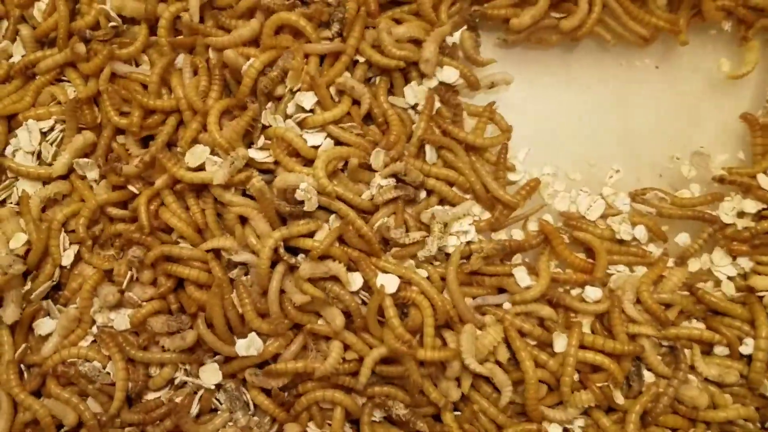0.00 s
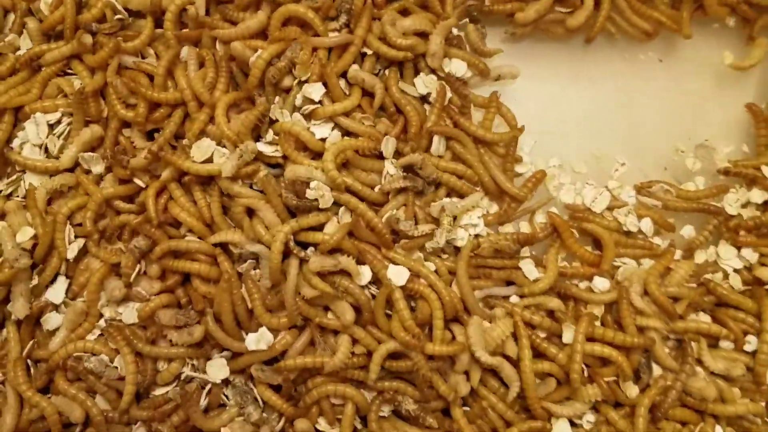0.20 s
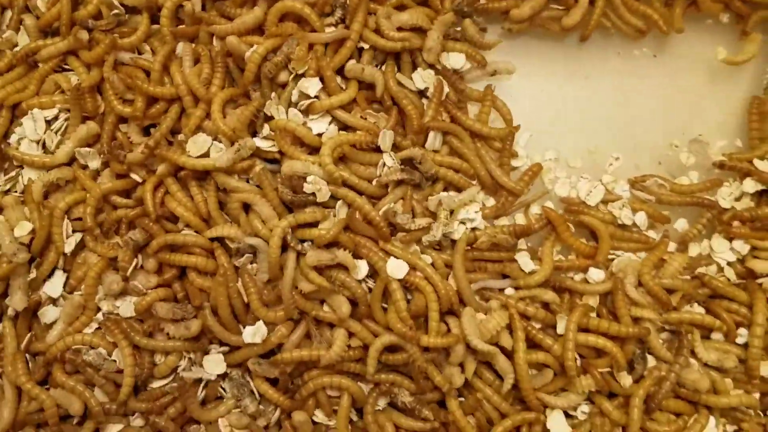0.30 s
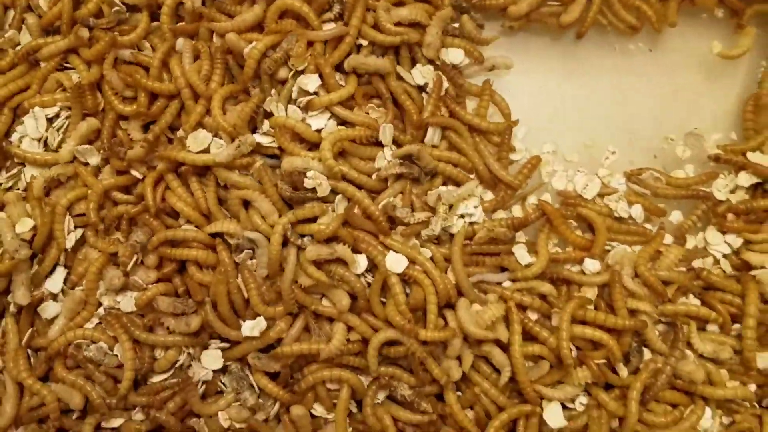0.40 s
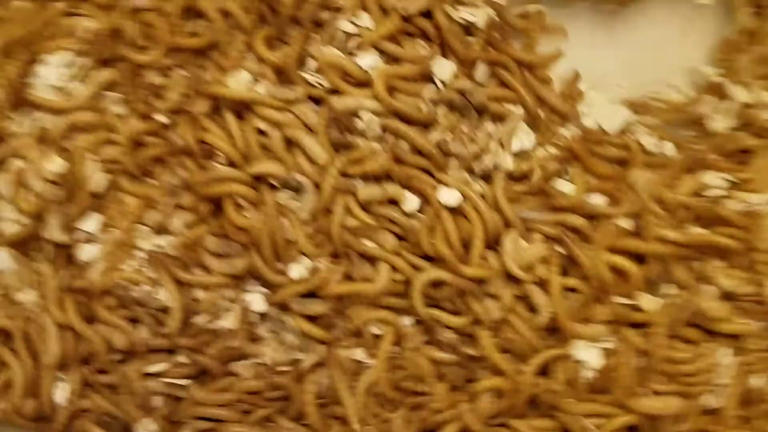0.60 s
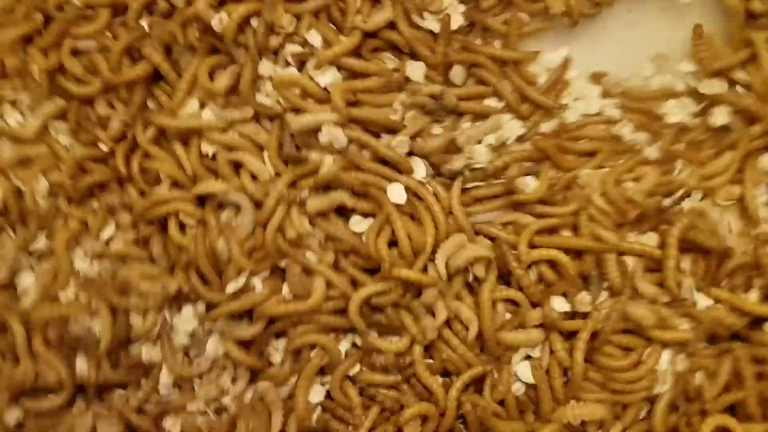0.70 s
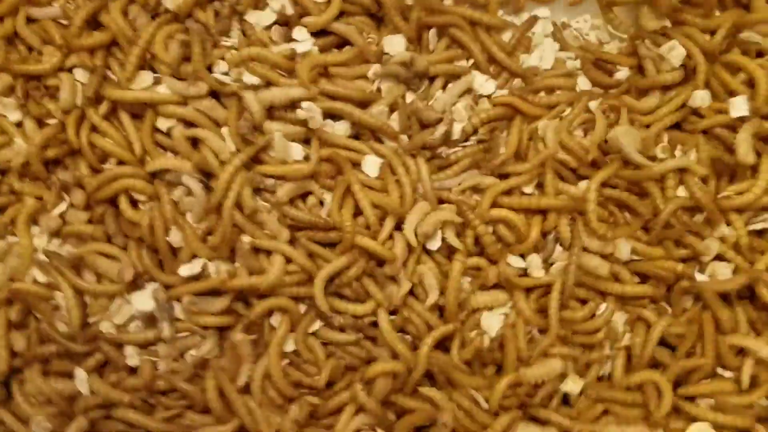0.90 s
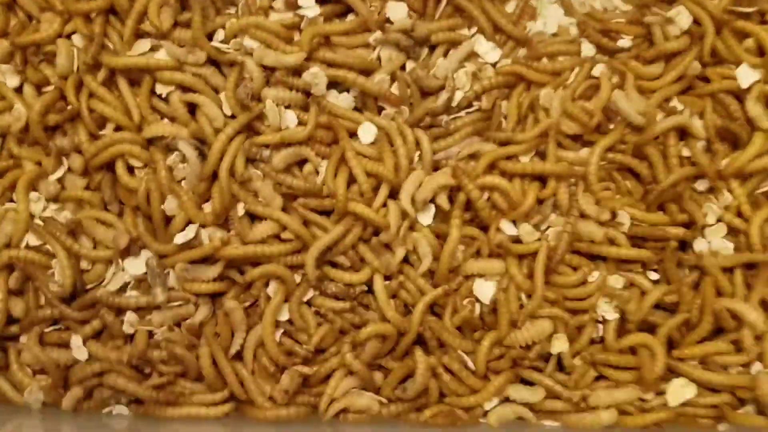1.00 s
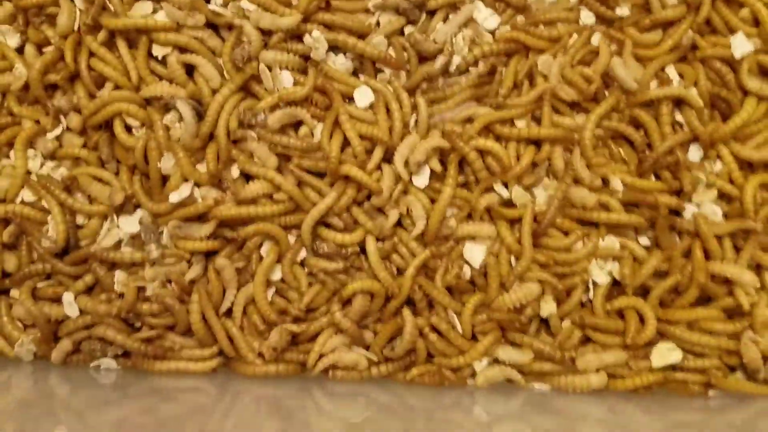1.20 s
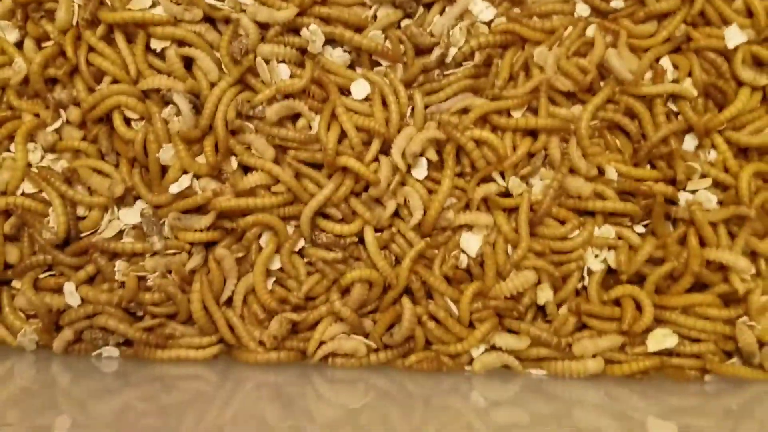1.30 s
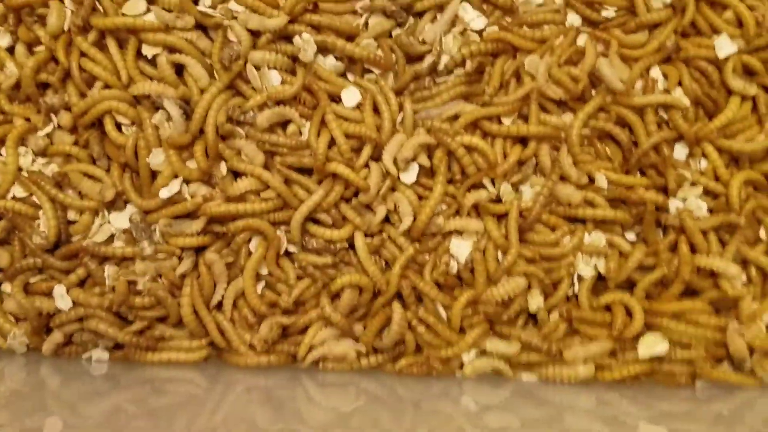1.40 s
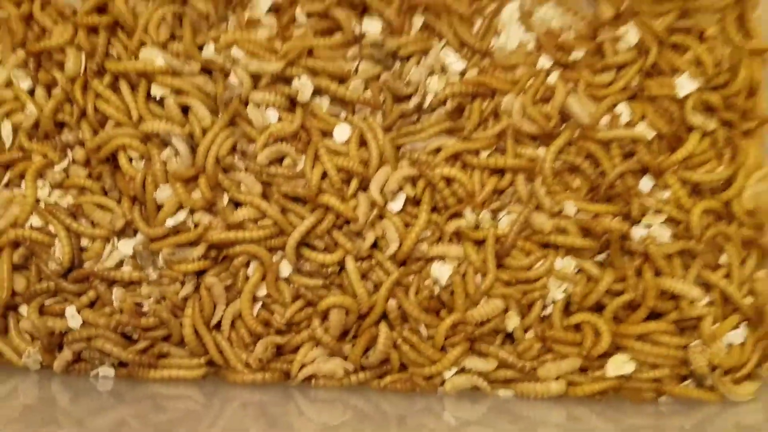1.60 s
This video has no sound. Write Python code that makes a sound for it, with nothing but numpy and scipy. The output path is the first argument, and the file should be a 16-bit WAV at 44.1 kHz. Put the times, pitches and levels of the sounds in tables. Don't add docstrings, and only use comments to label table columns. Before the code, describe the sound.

A heap of mealworms and dry oat flakes slides in a plastic tub: a few faint taps, then one crackling sweep with sharp snaps and soft thumps, fading to low room hum; close stereo microphone, small quiet room.

```python
import sys
import numpy as np
from scipy import signal
from scipy.fft import rfft, irfft, next_fast_len
from scipy.io import wavfile

SR = 44100
rng = np.random.default_rng(int(sys.argv[2]) if len(sys.argv) > 2 else 0)


def magnitude_from_level(level_db):
    exponent = np.asarray(level_db, float) / 20
    return 10 ** exponent


def persist_wave(psi):
    counts = np.round(np.clip(psi, -1, 1) * 32767).astype(np.int16)
    wavfile.write(sys.argv[1], SR, np.atleast_2d(counts).T)


N = 74970

# start_s, peak_db, length_s, dull_part_db, left_right_db
CLUMP_CRUSHES = [(0.131, -45, .008, 15, 3), (0.173, -36, 0.0078, 3.5, 3), (0.2204, -31.5, .005, 0.5, 2),
                 (0.263, -46, 0.0045, 12.5, -3), (0.435, -25, 0.0054, -18, -2),
                 (0.531, -16.5, 0.013, -1.5, 4), (0.597, -22, 0.011, -1, 10), (0.62, -15.5, 0.011, -6, 8),
                 (.637, -23, .014, -6, -3), (0.68, -28, 0.0056, -7, 4), (.695, -6.5, 0.0076, -8, 12),
                 (0.706, -16, 0.023, -8, 7.5), (0.721, -17, 0.015, 7, 6), (0.773, -19, 0.016, -21, 13),
                 (.788, -30, 0.009, -12, 12), (0.834, -23, .014, 7, 11), (0.871, -20, 0.019, 1.5, 8),
                 (0.919, -22, 0.013, 3.5, 14), (1.128, -33, 0.023, -10, 3), (1.24, -35.5, .004, 6.5, 10),
                 (1.2552, -31.5, 0.0067, 0, -6)]
# start_s, peak_db, pitch_hz, left_right_db
FLAKE_SNAPS = [(0.1313, -30.5, 2490, 4), (.1745, -31, 3900, 0), (0.176, -43, 3900, 3),
               (.2215, -32, 1940, 4), (.269, -45, 1200, 3), (0.372, -40, 2670, 2), (0.415, -27, 2820, -4),
               (.4412, -12, 4500, 11), (.4465, -15, 2600, 11), (.470, -11, 2500, 7), (.481, -20, 8000, 10),
               (.5935, -14, 2600, 12), (.6955, -6, 5500, 13), (.7405, -11, 7500, 6), (.7805, -9, 5000, 12),
               (.8125, -7, 6500, 11), (.874, -7, 6500, 10), (.914, -21, 6000, 11), (.922, -17, 6500, 11),
               (.9315, -8, 6500, 13), (.931, -13, 2200, 14), (.991, -31, 5500, 12), (1.015, -28, 2400, 10),
               (1.132, -44, 2720, 3), (1.182, -51, 5000, -8), (1.245, -21.5, 2600, 7),
               (1.2545, -17.5, 2580, 9), (1.344, -34, 2070, 6), (1.438, -48, 2500, 2),
               (1.515, -50, 6000, -3), (1.569, -39.5, 7000, 3)]
# frequency_hz, left_over_right_db
PORT_BALANCE = [(250, 2), (500, 3), (1000, 7), (2000, 10.5), (5000, 12), (9000, 4), (15000, 3)]
CRUSH_DB = -11.5
SNAP_TAIL_S = 0.003


def rms_one(x):
    return x / np.sqrt(np.mean(x ** 2) + 1e-20)


def at_hz(points, hz):
    curve_hz, curve_db = np.transpose(points)
    return np.interp(np.log(hz), np.log(curve_hz), curve_db)


def bump(hz, centre_hz, width_hz, db):
    return db / (1 + ((hz - centre_hz) / width_hz * 2) ** 2)


def drift(rate_hz):
    r = np.exp(-2 * np.pi * rate_hz / SR)
    noise = rng.standard_normal(N + SR)
    return rms_one(signal.lfilter([1], [1, -2 * r, r * r], noise)[SR:])


def colour(x, db_at):
    size = next_fast_len(N + 8192)
    hz = np.arange(4097) * SR / 8192 + 1
    cepstrum = irfft(np.log(magnitude_from_level(db_at(hz))))
    cepstrum[1:4096] *= 2
    cepstrum[4097:] = 0
    impulse = irfft(np.exp(rfft(cepstrum)))
    return irfft(rfft(x, size) * rfft(impulse, size), size)[..., :N]


def left_late(x):
    return np.array([np.roll(x[0], 16), x[1]])


def stereo(mid, side, db_at):
    # frequency_hz, likeness (1 = the same)
    port_likeness = [(60, 0.76), (150, 0.99), (300, 1), (600, 0.93), (900, 0.78), (1500, 0.5), (3000, 0.12),
                     (6000, 0.041)]

    def alike(hz):
        return np.clip(at_hz(port_likeness, hz), -.98, .98)

    mid = colour(mid, lambda hz: db_at(hz) + 10 * np.log10(1 + alike(hz)))
    side = colour(side, lambda hz: db_at(hz) + 10 * np.log10(1 - alike(hz)))
    return rms_one(left_late([mid + side, mid - side]))


def panned(left_right_db):
    return magnitude_from_level(np.array([[.5], [-.5]]) * left_right_db)


def burst(start_s, length_s, rise_s, fall_s):
    t = np.arange(N) / SR - start_s
    return np.clip(t / rise_s, 0, 1) * np.exp(-np.maximum(t - length_s, 0) / fall_s)


def wall(hz):
    # pitch_hz, width_hz, level_db
    wall_modes = [(511, 38, -1), (794, 46, 7), (1008, 40, -4.5), (1135.4, 82, 10), (1286, 177, 8.5),
                  (1643, 70, 8.5), (1924, 340, 6), (2212, 160, 3), (2330, 13, 1.5), (2651, 110, 4),
                  (4100, 2300, 4.5)]
    return sum(bump(hz, *mode) for mode in wall_modes)


def ports(x, db_at):
    def tilt(hz):
        return at_hz(PORT_BALANCE, hz) / 2

    def port_peak(hz):
        return bump(hz, centre_hz=8150, width_hz=1900, db=9)

    left = colour(x[0], lambda hz: db_at(hz) + tilt(hz) + port_peak(hz))
    right = colour(x[1], lambda hz: db_at(hz) - tilt(hz))
    return np.array([left, right])


def grains():
    grains_per_s, spread_db, biggest_grain = 4000, 4.5, 2.5
    smooth_share = .35
    patch_db, patch_hz = 3.2, 30
    sizes = np.minimum(rng.exponential(1, N), biggest_grain)
    clicks = magnitude_from_level(spread_db * sizes) * rng.choice([-1, 1], N)
    clicks *= rng.random(N) < grains_per_s / SR
    pitches = np.geomspace(250, 14000, 12)
    dealt = rng.integers(0, 12, N)
    hiss_gain = np.std(clicks) * np.sqrt(smooth_share / (1 - smooth_share) / len(pitches))
    hiss = rng.standard_normal((2, N)) * hiss_gain
    rings = 0
    for k, hz in enumerate(pitches):
        b, a = signal.butter(1, [hz / 1.68, hz * 1.47], "band", fs=SR)
        ring = signal.lfilter(b, a, clicks * (dealt == k) + hiss[k % 2])
        rings = rings + ring * magnitude_from_level(patch_db * drift(patch_hz))
    return rms_one(rings)


def even_grains():
    return stereo(grains(), grains(), lambda hz: 0 * hz)


def hum():
    # frequency_hz, density_db
    room_curve = [(15, -68), (25, -47), (123, -2.5), (167, -28), (248, 0), (356, -12.5), (575, -37.5),
                  (648, -19), (1500, -14.5), (1950, -55), (3300, -120)]
    # pitch_hz, width_hz, level_db
    room_tones = [(124.6, 44, -47.5), (267, 23, -61.5), (290, 32, -60.5)]
    out = magnitude_from_level(-53.5) * stereo(*rng.standard_normal((2, N)), lambda hz: at_hz(room_curve, hz))
    for hz, width_hz, db in room_tones:
        b, a = signal.iirpeak(hz, hz / width_hz, SR)
        tone = signal.lfilter(b, a, rng.standard_normal(N + SR))
        tone = signal.lfilter(b, a, tone)[SR:]
        out = out + magnitude_from_level(db) * rms_one(tone)
    return out


def rumble(slide_db):
    # frequency_hz, density_db
    rumble_curve = [(25, -16.5), (70, -3), (160, -6.5), (240, -0.5), (300, -9.5), (500, -7.5), (800, -19),
                    (1500, -66.5)]
    low = stereo(*rng.standard_normal((2, N)), lambda hz: at_hz(rumble_curve, hz))
    follow_db = 0.78 * np.minimum(slide_db + 38.5, 0)
    lumps_db = 2.2 * drift(24)
    return low * panned(1) * magnitude_from_level(-35.5 + follow_db + lumps_db)


def crackle(slide_db):
    # frequency_hz, density_db
    crackle_curve = [(250, -8.5), (500, -2), (1500, -8), (2900, -6.5), (3400, -12.5), (8500, -10.5),
                     (10800, -19.5), (16000, -25.5)]
    slide_trim_db, flicker_db, flicker_hz = 2.5, 1.2, 60
    spray_rise_s = .0002

    def shape(hz):
        return at_hz(crackle_curve, hz) + wall(hz)

    heap = even_grains()
    heap = heap / np.std(ports(heap, shape).mean(axis=0))
    flicker = flicker_db * drift(flicker_hz)
    power = magnitude_from_level(slide_db + slide_trim_db + flicker) ** 2 * np.ones((2, 1))
    usual_pan = at_hz(PORT_BALANCE, 3600)
    for start_s, db, length_s, _, pan_db in CLUMP_CRUSHES:
        crush = burst(start_s, length_s, rise_s=.0005, fall_s=.0025)
        power = power + (magnitude_from_level(db + CRUSH_DB) * panned(pan_db - usual_pan) * crush) ** 2
    for start_s, db, _, pan_db in FLAKE_SNAPS:
        spray = magnitude_from_level(-17) * burst(start_s, 0.0015, spray_rise_s, 0.00084)
        spray += magnitude_from_level(-24) * burst(start_s, 0.002, spray_rise_s, SNAP_TAIL_S)
        power = power + (magnitude_from_level(db) * panned(pan_db - usual_pan) * spray) ** 2
    return ports(heap * np.sqrt(power), shape)


def rubs():
    # start_s, length_s, level_db, pitch_hz
    wall_rubs = [(0.129, 0.025, -44.5, 1276), (0.142, 0.0055, -57, 1800), (0.173, 0.0056, -48, 3960),
                 (0.172, 0.005, -41, 700), (0.224, 0.0042, -40.5, 734), (.222, .006, -36, 400),
                 (.441, 0.0035, -32, 4450), (.775, 0.016, -33.5, 2760), (0.87, 0.0028, -30, 7700),
                 (0.537, 0.022, -34, 7840), (0.597, .014, -36, 1133), (0.632, 0.0094, -37, 1210),
                 (0.695, 0.0097, -28, 1860), (0.732, 0.0094, -21.5, 817), (0.838, 0.0076, -28, 590),
                 (.842, 0.0056, -21.5, 777), (0.833, 0.012, -30.5, 1285), (.837, .009, -33, 2700),
                 (1.37, .03, -56, 1130), (0.92, .006, -28, 1100), (0.928, 0.014, -28.5, 1310),
                 (0.87, .016, -30, 415), (0.925, 0.013, -28, 586), (1.132, 0.013, -49, 4250),
                 (1.143, 0.0055, -43, 2600), (1.131, .010, -51, 2500), (1.132, 0.012, -54, 6200),
                 (1.14, 0.011, -53, 1680), (1.252, 0.0015, -32.5, 2610), (1.25, .018, -36, 334),
                 (1.251, 0.011, -43, 1050), (1.253, 0.012, -50, 1650), (1.269, 0.0028, -52, 3000)]
    out = 0
    grit = rng.standard_normal((2, N)) * magnitude_from_level(2.0 * rng.standard_normal(N))
    grit[1] = 0.55 * grit[0] + 0.9 * grit[1]
    for start_s, length_s, db, hz in wall_rubs:
        b, a = signal.iirpeak(hz, 10.1, SR)
        band = signal.lfilter(b, a, signal.lfilter(b, a, grit))
        shape = burst(start_s, length_s, rise_s=.001, fall_s=.002)
        loudness = np.sqrt(np.sum((band * shape) ** 2) / np.sum(shape ** 2) / 2)
        out = out + magnitude_from_level(db) * panned(at_hz(PORT_BALANCE, hz)) * shape * band / loudness
    return left_late(out)


def thumps():
    # start_s, peak_db, pitch_hz, t60_s
    tub_thumps = [(0.13, -19, 526, 0.018), (.172, -20, 148, 0.047), (.2205, -12.5, 170, 0.039),
                  (0.27, -22.5, 138.8, 0.084), (0.376, -27.5, 110, 0.042), (0.501, -14, 140, 0.051),
                  (0.521, -22, 253, 0.069), (0.574, -24, 118, 0.091), (0.629, -45, 290, 0.038),
                  (0.684, -12.5, 147, 0.047), (0.702, -6, 195, 0.046), (.716, -16, 239, 0.078),
                  (.725, -14, 496, 0.041), (0.731, -22.5, 316, 0.043), (0.735, -17, 144, 0.075),
                  (0.765, -22, 164, 0.072), (0.803, -22, 91, 0.072), (.829, -23, 195, 0.04),
                  (.851, -18, 187, 0.052), (0.86, -20.5, 230, 0.047), (.882, -14.5, 210, 0.028),
                  (0.925, -17.5, 177, 0.045), (0.988, -27.5, 200, 0.058), (1.132, -34, 155, 0.083),
                  (1.249, -29.5, 191, 0.078), (1.255, -22.5, 542.5, 0.046), (1.2563, -18, 196, 0.04),
                  (1.345, -35, 148, 0.086)]
    rise_cycles, overtone, overtone_db = 0.32, 2.73, -8.5
    contact_hz = 1340
    out, t = np.zeros(N + SR), np.arange(SR // 2) / SR
    for start_s, db, hz, t60_s in tub_thumps:
        ring = np.sin(2 * np.pi * hz * t) * magnitude_from_level(-60 * t / t60_s)
        ring *= 1 - np.exp(-t * hz / rise_cycles)
        upper = np.sin(2 * np.pi * hz * overtone * t) * magnitude_from_level(-60 * t * overtone / t60_s)
        ring += magnitude_from_level(overtone_db) * upper
        i = int(start_s * SR)
        out[i:i + len(t)] += magnitude_from_level(db + 1.5) * ring
    soft = signal.lfilter(*signal.butter(2, contact_hz, fs=SR), out[:N])
    return left_late(soft * panned(1.5))


def dull_crush():
    # frequency_hz, density_db
    boxy_curve = [(120, -18), (250, 7), (500, 10), (900, 1.5), (1400, -1), (2200, -10), (4000, -18)]

    def shape(hz):
        return at_hz(boxy_curve, hz) + wall(hz)

    body = even_grains()
    gain = 0
    for start_s, db, length_s, dull_db, _ in CLUMP_CRUSHES:
        rattle = burst(start_s, length_s, rise_s=0.0033, fall_s=0.015)
        gain = gain + magnitude_from_level(db + dull_db + CRUSH_DB) * rattle
    return colour(body * gain, shape) / np.std(colour(body, shape)) * panned(5.6)


def snaps():
    ring_q, scratch_db, trim_db = 2.5, -14, -1
    port_cut_hz = 9500
    out, t = np.zeros((2, N + 1000)), np.arange(1000) / SR
    for start_s, db, hz, pan_db in FLAKE_SNAPS:
        noise = rng.standard_normal((2, len(t)))
        width = np.pi * hz / ring_q / SR
        scratch = magnitude_from_level(scratch_db) * noise * np.exp(-t / SNAP_TAIL_S) / np.sqrt(width)
        click = (t == 0) / width / 2
        ring = signal.lfilter(*signal.iirpeak(hz, ring_q, SR), scratch + click)
        i = int(start_s * SR)
        out[:, i:i + len(t)] += magnitude_from_level(db + trim_db) * panned(pan_db) * ring
    top_cut = signal.butter(4, port_cut_hz, fs=SR, output="sos")
    return signal.sosfilt(top_cut, left_late(out[:, :N]))


def scene():
    # time_s, level_db
    slide_curve = [(0, -59), (0.301, -61.5), (0.364, -57), (.405, -46), (0.432, -34.5), (0.501, -33.5),
                   (0.539, -28.5), (.575, -32), (0.644, -27), (0.671, -37.5), (.76, -33.5), (0.822, -34),
                   (.86, -34.5), (.95, -42), (1.08, -56), (1.21, -64), (1.37, -54.5), (1.46, -62),
                   (1.7, -62)]
    slide_db = np.interp(np.arange(N) / SR, *np.transpose(slide_curve))
    dry_flakes = crackle(slide_db) + snaps()
    tub_wall = rubs() + dull_crush() + thumps()
    return dry_flakes + tub_wall + rumble(slide_db) + hum()


def roll_off(x):
    return signal.sosfilt(signal.butter(12, 16820, fs=SR, output="sos"), x)


def record(dry):
    hiss = rng.standard_normal(dry.shape)
    hiss = signal.lfilter(*signal.butter(1, 3000, "high", fs=SR), hiss)
    low_cut = signal.butter(2, 52, "high", fs=SR, output="sos")
    x = signal.sosfilt(low_cut, dry) + magnitude_from_level(-66) * hiss
    x = 1.238 * np.tanh(x / 1.103)
    top_cut = signal.cheby2(12, 60, 16900, fs=SR, output="sos")
    return roll_off(signal.sosfilt(top_cut, x))


dry = scene()
out = record(dry)
persist_wave(out)
```